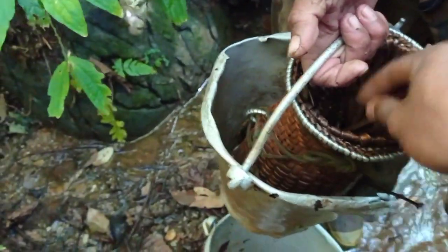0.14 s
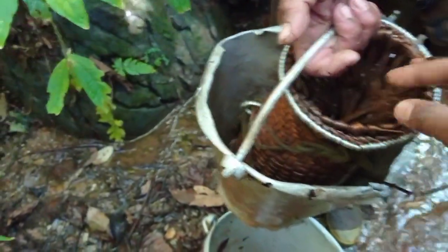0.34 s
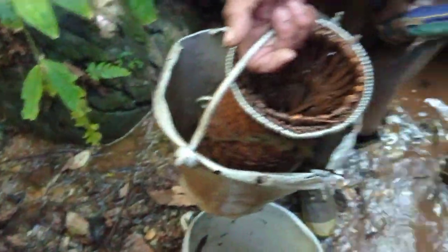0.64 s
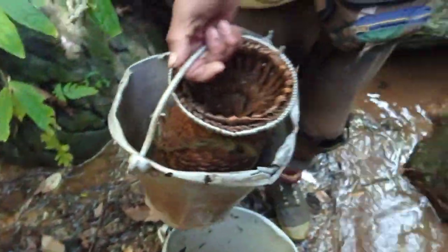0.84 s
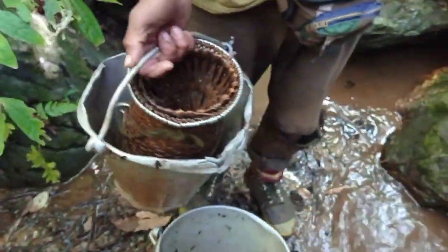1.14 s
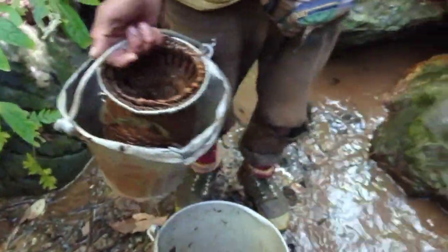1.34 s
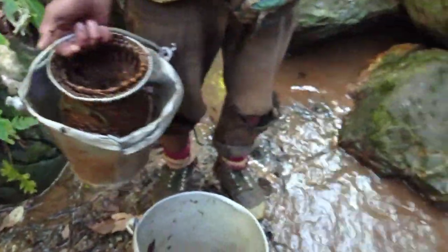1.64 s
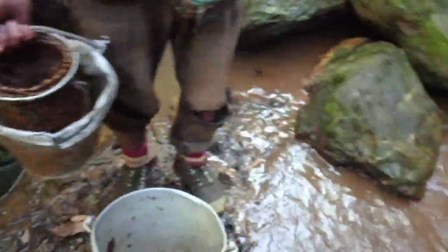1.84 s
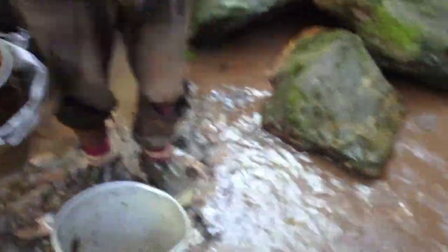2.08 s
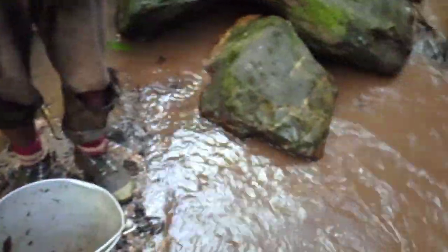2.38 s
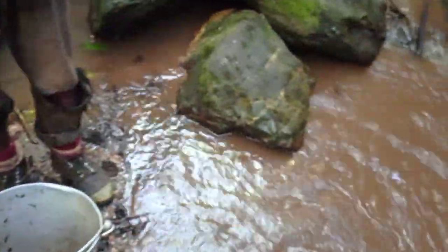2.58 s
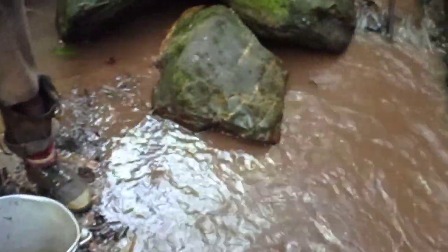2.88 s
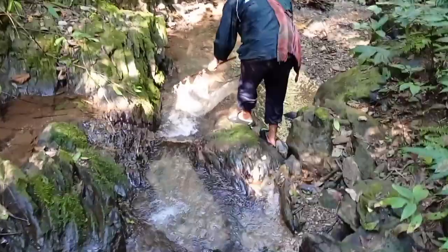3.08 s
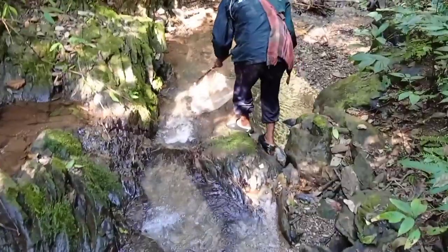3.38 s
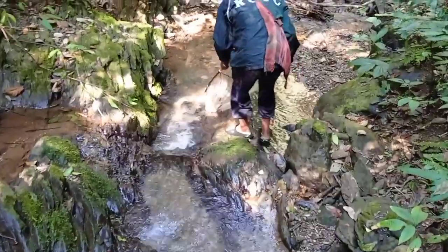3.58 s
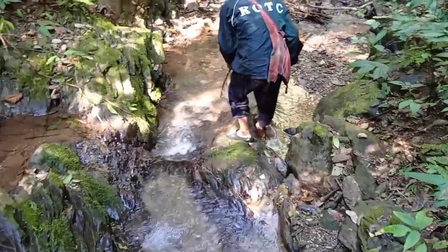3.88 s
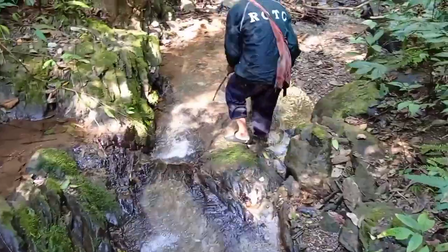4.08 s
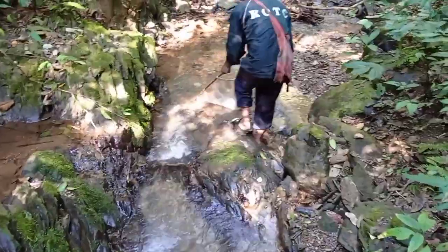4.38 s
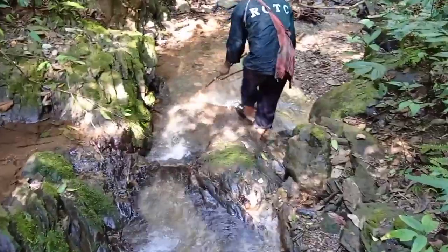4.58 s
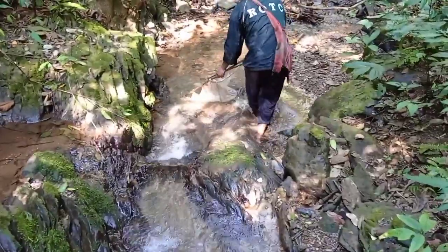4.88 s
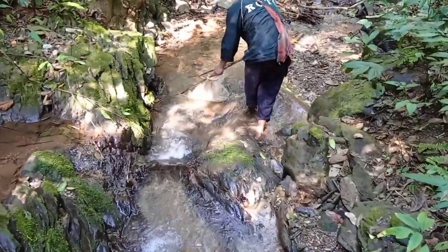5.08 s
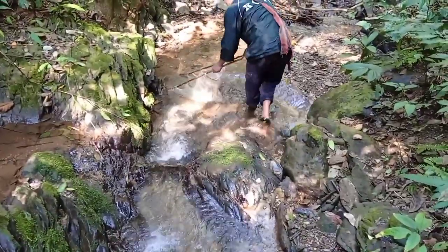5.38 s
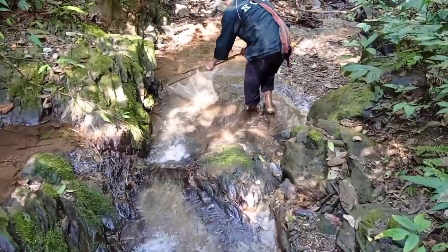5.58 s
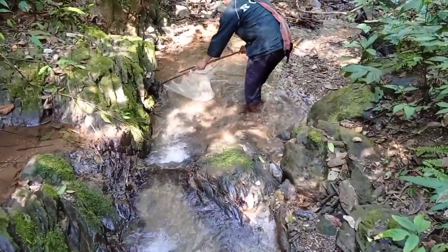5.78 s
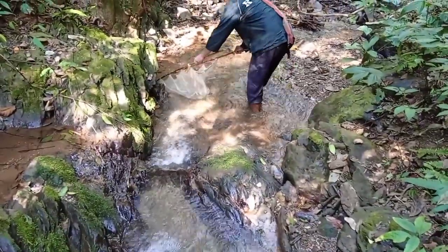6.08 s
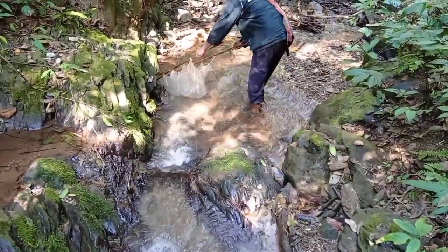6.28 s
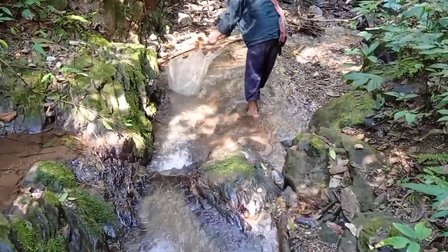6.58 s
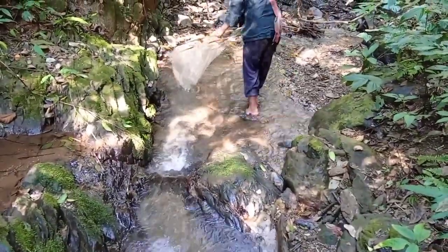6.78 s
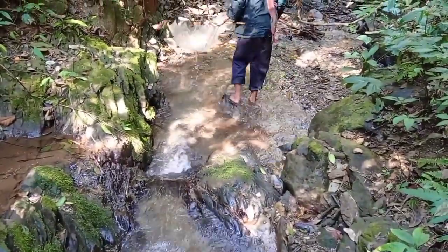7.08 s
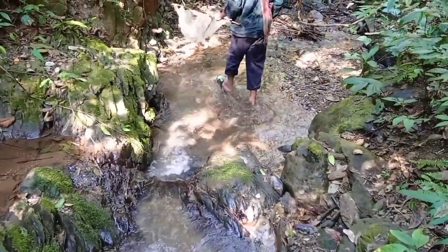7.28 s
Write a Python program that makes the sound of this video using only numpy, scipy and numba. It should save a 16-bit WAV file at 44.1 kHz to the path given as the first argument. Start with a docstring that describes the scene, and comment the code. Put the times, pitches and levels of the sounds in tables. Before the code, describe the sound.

Running water throughout, in two places. First a bubbling riffle near the bank, with round plops and little splashes, swelling as the microphone turns toward open current. After a very short complete silence, a denser cascade over a ledge rises in, hollow among rocks, with fine spray, scattered droplet pings and a soft bass bump. Natural outdoor pickup, close to the water, faint rumble below.

```python
"""A shallow forest stream, heard first beside a gurgling riffle, then, after a moment of silence, at a small cascade.
Thousands of bubbles, gliding decaying sines, ring over a smooth rush of noise coloured for each place.
Larger bubbles plop, drops of spray ping and bursts of filtered noise splash; a low rumble lies beneath.
Once a soft low bump, a sine that sinks and rises, reaches the microphone."""
import sys
import numpy as np
from scipy import signal
from scipy.fft import rfft, irfft, next_fast_len
from scipy.io import wavfile
from numba import njit

SR = 44100
rng = np.random.default_rng(int(sys.argv[2]) if len(sys.argv) > 2 else 0)


def dump_mix(stems):
    """Bounce the given channels to the path in sys.argv[1] as a 16-bit WAV at rate SR."""
    frames = np.atleast_2d(stems).T  # one column per channel
    limited = np.clip(frames, -1, 1)  # hard clip at full scale
    pcm = np.round(limited * 32767).astype(np.int16)
    wavfile.write(sys.argv[1], SR, pcm)


N = 328104
TIME_S = np.arange(N) / SR
CASCADE_FROM_S = 3
CUTOFF_HZ = 15850


def riffle():
    """Shallow water over stones; the listener turns from the bank to the open current, which is louder."""
    # colour of the water by the bank: pitch_hz, relative_density_db
    bank_colour = [(30, -40), (55, -41.5), (80, -24), (150, -18.5), (260, -2.5), (580, -1.5), (860, 3),
                   (1200, -5), (1750, -9.5), (2250, -3.5), (3000, -9), (5000, -12.5), (8500, -11),
                   (11000, -21)]
    # colour over the open riffle: pitch_hz, relative_density_db
    current_colour = [(30, -41), (55, -26.5), (80, -31), (150, -12), (260, -4), (450, -2), (900, -0.5),
                      (1800, -4.5), (2150, -11), (3000, -14.5), (3700, -12.5), (5000, -16), (8500, -15),
                      (11000, -26.5)]
    # turn towards the open current: time_s, current_share (0-1)
    turn = [(1.3, 0.15), (2.2, 0.79)]
    # levels before surges and random drift
    bank_gurgle_db, bank_spray_db = -46.5, -47.5
    current_gurgle_db, current_spray_db = -42.5, -41.5

    froth = bubbles(count=14000, low_hz=156, high_hz=16370, spread_db=0.5, cycles=2.0, rise_octaves=0.17)
    gurgles = bubbles(count=1600, low_hz=255.5, high_hz=1990, spread_db=1.2, cycles=3.566, rise_octaves=0.17)
    tinkles = bubbles(count=2200, low_hz=2463, high_hz=14700, spread_db=2.0, cycles=6.6, rise_octaves=0.026)
    water = rush(patchy_db=0.0, churn_hz=7.7)
    water = water + from_db(-3) * froth + from_db(-13.0) * gurgles + from_db(-11.5) * tinkles

    turn_s, share = np.transpose(turn)
    turned = np.interp(TIME_S, turn_s, share)

    def blend(bank, current):
        """Cross-fade from bank to current as the listener turns."""
        return (1 - turned) * bank + turned * current

    water = blend(coloured(water, bank_colour), coloured(water, current_colour))
    gurgle_db = blend(bank_gurgle_db, current_gurgle_db)
    spray_db = blend(bank_spray_db, current_spray_db)
    water = flowing(water, gurgle_db, spray_db, slosh_db=1.45, spatter_db=0.0)
    return bass_shifts(water, edge_hz=230, drift_db=4.0, corner_hz=7.1)


def cascade():
    """Water drops over a ledge and spatters into a pool between hollow rocks."""
    # colour of the falling water: pitch_hz, relative_density_db
    cascade_colour = [(30, -23), (50, -38), (80, -18.5), (120, -8.5), (180, -1.5), (310, 6), (450, 4),
                      (950, 1.5), (1250, -2.5), (2400, -2), (3400, -6), (5000, -11.5), (8000, -8.5),
                      (11000, -16.5)]
    # resonant hollows between the rocks: centre_hz, width_hz, gain_db
    hollows = [(178, 20, 7), (262, 54, 6), (1487, 137, 4.5), (2640, 420, 4.5), (4270, 780, 4.5)]

    froth = bubbles(count=20000, low_hz=131, high_hz=16100, spread_db=3.5, cycles=1.4, rise_octaves=0.13)
    gurgles = bubbles(count=1700, low_hz=203.3, high_hz=2191, spread_db=1.33, cycles=3.81, rise_octaves=0.15)
    tinkles = bubbles(count=2400, low_hz=3500, high_hz=14620, spread_db=1.5, cycles=6.5, rise_octaves=0.0067)
    water = rush(patchy_db=1.5, churn_hz=27.7)
    water = water + from_db(-4.5) * froth + from_db(-13.0) * gurgles + from_db(-7.0) * tinkles
    water = coloured(water, cascade_colour, hollows)
    return flowing(water, gurgle_db=-42, spray_db=-39.0, slosh_db=0.48, spatter_db=0.72)


def flowing(water, gurgle_db, spray_db, slosh_db, spatter_db):
    """Deep gurgle and bright spray vary at random and change level with each surge of the water."""
    # swelling and settling: crest_s, half_length_s, gurgle_gain_db, spray_gain_db
    surges = [(0.507, .04, 5.5, 1.7), (0.696, 0.13, 2.5, 3), (1.562, 0.07, -1.5, 1.7),
              (1.735, 0.065, 3.5, 0.7), (2.424, 0.13, 0.7, 2), (2.695, .08, -0.7, 3),
              (3.336, 0.052, 4, -0.3), (4.79, .05, 2.5, 1), (5.596, 0.13, 3.5, 0.5),
              (7.275, 0.33, 0.9, 0.5)]
    for crest_s, half_s, gurgle_gain_db, spray_gain_db in surges:
        swell = hump(crest_s, half_s)
        gurgle_db = gurgle_db + gurgle_gain_db * swell
        spray_db = spray_db + spray_gain_db * swell
    gurgle = low_part(water, edge_hz=1980)
    spray = water - gurgle
    slosh = slosh_db * drift(23)
    spatter = spatter_db * drift(68)
    gurgle = rms_one(gurgle) * from_db(gurgle_db + slosh)
    spray = rms_one(spray) * from_db(spray_db + .5 * slosh + spatter)
    return gurgle + spray


def bass_shifts(sound, edge_hz, drift_db, corner_hz):
    """The recorder's low-cut filter shifts: bass below an edge dips and swells, with small random drift."""
    # bass dips and swells: middle_s, half_length_s, gain_db
    shifts = [(.26, .06, -16), (.6, .08, 14), (2.73, .05, 9)]
    bass_db = drift_db * drift(corner_hz) + sum(db * hump(s, half_s) for s, half_s, db in shifts)
    return sound + (from_db(bass_db) - 1) * low_part(sound, edge_hz)


def bubbles(count, low_hz, high_hz, spread_db, cycles, rise_octaves):
    """Bubbles born at random, more per octave the smaller; each rises in pitch as it nears the surface."""
    when, size, strength, damping = rng.random((count, 4)).T
    root_low, root_high = np.sqrt(low_hz), np.sqrt(high_hz)
    hz = (root_low + size * (root_high - root_low)) ** 2
    db = 15 * np.log10(hz / high_hz)
    db = db + spread_db * np.minimum(-np.log(1 - strength), 5)
    decay_s = cycles * (hz / 1000) ** .5 * (.5 + damping) / hz
    rise = rise_octaves * damping * 2
    return rms_one(ring(np.column_stack([when * N / SR, hz, db, decay_s / 5, decay_s, rise])))


def rush(patchy_db, churn_hz):
    """Countless merged bubbles: white noise whose bands, about an octave wide, churn on their own."""
    out = 0
    edges_hz = 30 * 2. ** np.arange(10)
    for low_hz, high_hz in zip(edges_hz, [*edges_hz[1:-1], CUTOFF_HZ + 2000]):
        bandpass = signal.butter(2, [low_hz, high_hz], "band", fs=SR, output="sos")
        band = signal.sosfilt(bandpass, rng.standard_normal(N))
        out = out + band * from_db(patchy_db * drift(churn_hz))
    return rms_one(out)


def plops():
    """Every large bubble swells and rings for the same number of cycles, so deep ones last longer."""
    # large bubbles: peak_s, pitch_hz, level_db
    large_bubbles = [(0.371, 1290, -35), (.397, 690, -29), (0.4019, 986, -20), (.583, 860, -30),
                     (.6, 233, -38), (.626, 940, -28), (.727, 464, -29), (.755, 1434, -35),
                     (1.001, 875, -32), (1.665, 690, -33.5), (1.757, 560, -31.5), (1.963, 426, -27),
                     (2.165, 597, -30), (2.341, 1400, -27.5), (2.535, 714, -32), (2.691, 263, -37),
                     (2.796, 263, -40), (3.328, 1080, -28), (3.346, 310, -31), (4.303, 910, -29.5),
                     (4.761, 1500, -22.5), (4.777, 830, -30), (4.872, 466, -33), (5.281, 251, -35),
                     (7.158, 2280, -26)]
    swell_cycles, decay_cycles, rise_octaves = 1.718, 3, 0.13
    return ring(np.array([(s, hz, db, swell_cycles / hz, decay_cycles / hz, rise_octaves)
                          for s, hz, db in large_bubbles]))


def drops(swell_s, decay_s, rise_octaves):
    """Each landing drop of spray traps one tiny bubble that pings."""
    # landings: peak_s, pitch_hz, level_db
    landings = [(0.581, 2180, -20), (2.224, 5580, -28), (2.394, 6700, -24.5), (2.438, 3700, -28),
                (2.656, 7300, -23.5), (3.492, 7250, -23), (4.321, 4434, -27), (4.3665, 8140, -19.5),
                (5.413, 2740, -23.5), (6.164, 10600, -28), (6.179, 2610, -24), (6.179, 4200, -24),
                (6.432, 6830, -26), (7.372, 2840, -23)]
    return ring(np.array([(s, hz, db, swell_s, decay_s, rise_octaves) for s, hz, db in landings]))


def splashes():
    """Short bursts of grainy spray; the coarser the drops, the duller and longer the burst."""
    # small splashes and sloshes: start_s, level_db, centre_hz
    bursts = [(0.392, -36, 820), (.566, -38.5, 3100), (0.578, -36, 1550), (0.738, -38.5, 800),
              (2.392, -35, 4200), (2.421, -36, 4200), (3.31, -40, 1000), (4.776, -38, 1100),
              (6.217, -31.5, 6000)]
    width_octaves = 2.2
    decay_at_1khz_s, shortening_power = 0.019, 0.27
    out = 0
    spray = rng.standard_normal(N) * from_db(2.0 * drift(300))
    reach = 2 ** (width_octaves / 2)
    for start_s, db, hz in bursts:
        band = signal.butter(2, [hz / reach, min(hz * reach, CUTOFF_HZ)], "band", fs=SR, output="sos")
        decay_s = decay_at_1khz_s * (1000 / hz) ** shortening_power
        envelope = (TIME_S >= start_s) * np.exp(-np.abs(TIME_S - start_s) / decay_s)
        out = out + from_db(db) * envelope * rms_one(signal.sosfilt(band, spray))
    return out


def bump():
    """One dull bass tone, lowest in its middle, with a soft knock at each end."""
    # knocks: peak_s, level_db
    knocks = [(4.077, -34), (4.21, -40.5)]
    middle_s, half_s, knock_half_s = 4.143, 0.076, 0.0067
    low_hz, end_hz, tone_db = 67, 172, -50
    away = np.minimum(np.abs(TIME_S - middle_s) / half_s, 1)
    hz = low_hz * (end_hz / low_hz) ** (away ** 2.9)
    level = from_db(tone_db) * (1 - away ** 10)
    level = level + sum(from_db(db) * hump(s, knock_half_s) for s, db in knocks)
    return level * np.sin(2 * np.pi * np.cumsum(hz) / SR)


def rumble(level_db, throb_db):
    """Deep eddies throb faintly under the stream: low noise with a drifting level."""
    # pitch_hz, relative_density_db
    spectrum = [(30, -20), (55, -19.5), (80, 0.0), (130, -0.5), (300, -31.0), (1000, -72.5)]
    low = coloured(rng.standard_normal(N), spectrum)
    return rms_one(low) * from_db(level_db + throb_db * drift(14))


@njit
def ring(rows):
    """Sum of gliding sines that swell and die: rows of peak_s, pitch_hz, level_db, swell_s, decay_s, octaves."""
    out = np.zeros(N)
    for k in range(len(rows)):
        s, hz, db, swell, decay, rise = rows[k]
        phase, height = 0., 10 ** (db / 20)
        first = max(0, int((s - 4 * swell) * SR))
        last = min(N, int((s + 6 * decay) * SR))
        for i in range(first, last):
            t = i / SR - s
            phase += 2 * np.pi * hz / SR * 2 ** (rise * t / (decay + abs(t)))
            out[i] += height * np.exp(t / swell if t < 0 else -t / decay) * np.sin(phase)
    return out


def drift(corner_hz):
    """Slow random curve of unit RMS: twice-smoothed noise, drawn every 40 samples."""
    r = np.exp(-80 * np.pi * corner_hz / SR)
    noise = rng.standard_normal(N // 40 + 2002)
    slow = signal.lfilter([1], [1, -2 * r, r * r], noise)[2000:]  # drop the settling
    return np.interp(np.arange(N) / 40, np.arange(len(slow)), rms_one(slow))


def hump(centre_s, half_s):
    """A bell in time, of height 1."""
    return np.exp(-((TIME_S - centre_s) / half_s) ** 2)


def from_db(db):
    """Decibels to gain."""
    return 10 ** (np.asarray(db) / 20)


def rms_one(x):
    """Scale to unit power."""
    return x / np.sqrt(np.mean(x ** 2) + 1e-20)


def filtered(x, gain_at):
    """Apply a gain given as a function of frequency."""
    size = next_fast_len(N + SR // 4, True)
    hz = np.maximum(np.arange(size // 2 + 1) * SR / size, 1)
    return irfft(rfft(x, size) * gain_at(hz), size)[:N]


def low_part(x, edge_hz):
    """What lies below an edge."""
    return filtered(x, lambda hz: 1 / (1 + (hz / edge_hz) ** 6))


def coloured(x, spectrum, resonances=()):
    """Shape by a smooth spectrum with resonant humps on it."""
    points_hz, points_db = np.transpose(spectrum)

    def gain_at(hz):
        """Spectrum interpolated over log frequency, plus the resonances."""
        db = np.interp(np.log(hz), np.log(points_hz), points_db)
        for centre_hz, width_hz, peak_db in resonances:
            db = db + peak_db / (1 + (2 * (hz - centre_hz) / width_hz) ** 2)
        return from_db(db)

    return filtered(x, gain_at)


def scene():
    """The riffle, then the cascade, with rumble, plops, drops, splashes and the bump."""
    stream = np.where(TIME_S < CASCADE_FROM_S, riffle(), cascade())
    stream = stream + rumble(level_db=-76.0, throb_db=4.0)
    singles = plops() + drops(swell_s=0.000378, decay_s=0.00085, rise_octaves=0.026) + splashes()
    return (stream + singles + bump())[None]


def record(dry):
    """Microphone colour, the silent gap with its fade-in, and the treble cut-off."""
    # microphone response: pitch_hz, gain_db
    response = [(25, -1.5), (70, 0.5), (5600, 0), (6600, 1), (7200, -2), (8000, -9.5), (10000, -5.5),
                (12200, -12), (13900, -22), (14700, -6)]
    silent_from_s, silent_to_s = 2.904, 3.0495
    return_s, return_start_gain, return_power = 0.26, 0.045, 1.23
    ramp = np.clip((TIME_S - silent_to_s) / return_s, 0, 1) ** return_power
    returning = return_start_gain + (1 - return_start_gain) * ramp
    fade = (TIME_S < silent_from_s) + (TIME_S > silent_to_s) * returning
    heard = coloured(dry[0], response) * fade
    return filtered(heard, lambda hz: np.clip((CUTOFF_HZ - hz) / 200 + .5, 0, 1))[None]


dry = scene()
out = record(dry)
dump_mix(out)
```